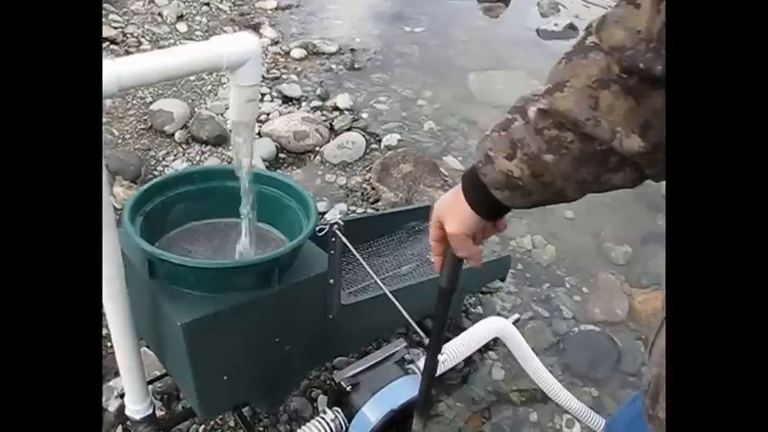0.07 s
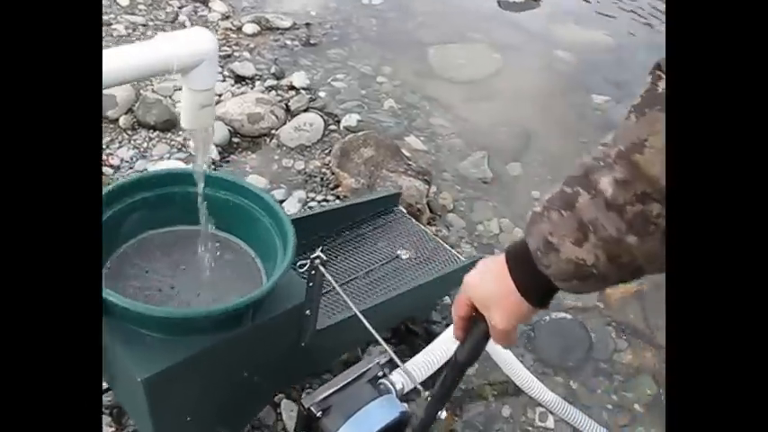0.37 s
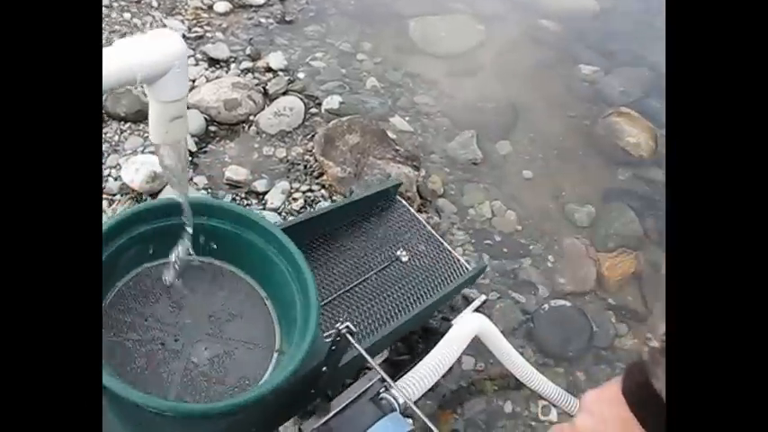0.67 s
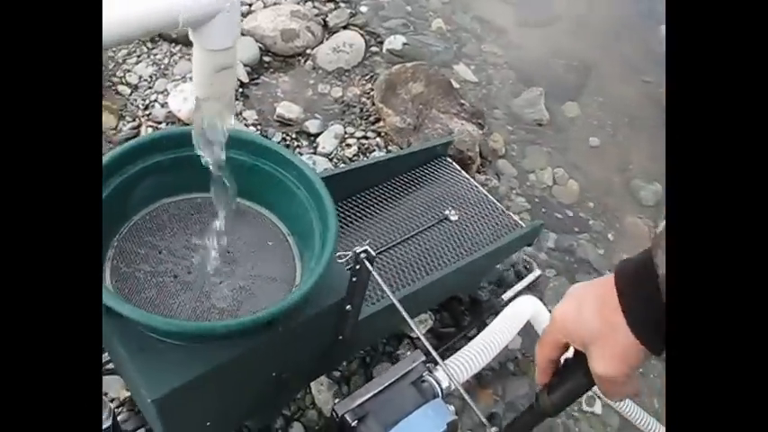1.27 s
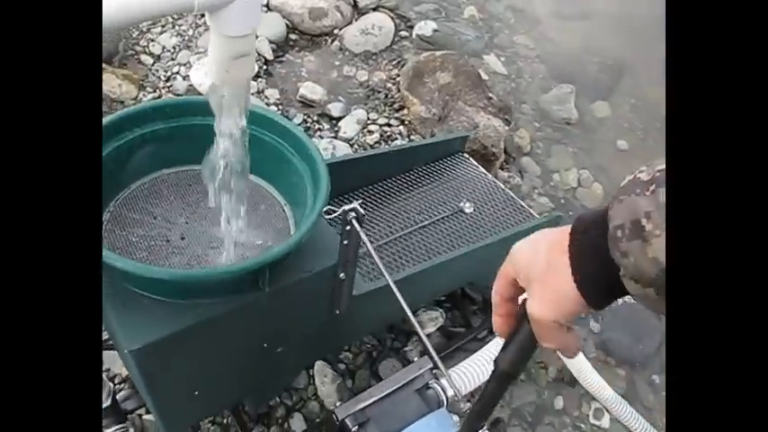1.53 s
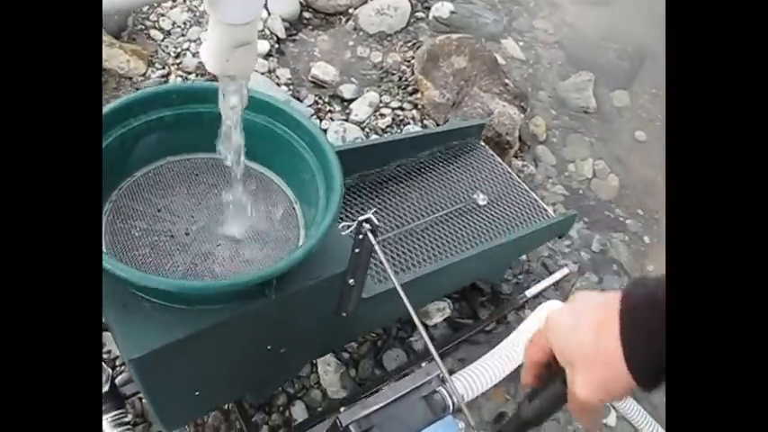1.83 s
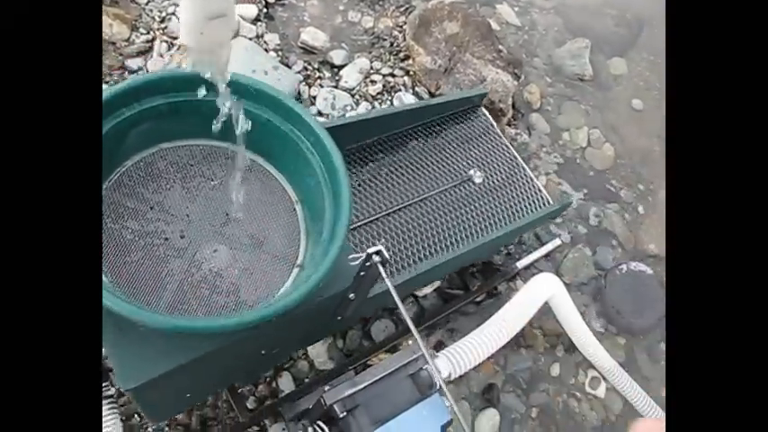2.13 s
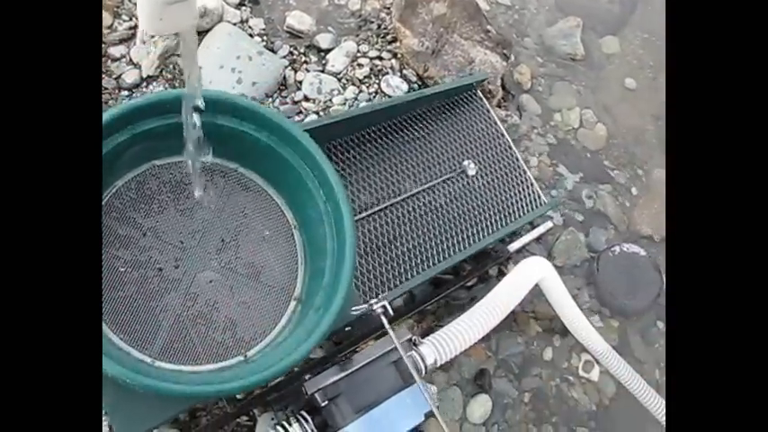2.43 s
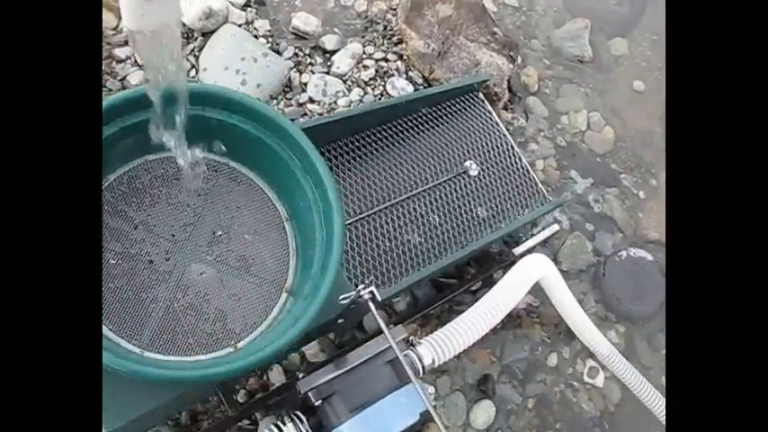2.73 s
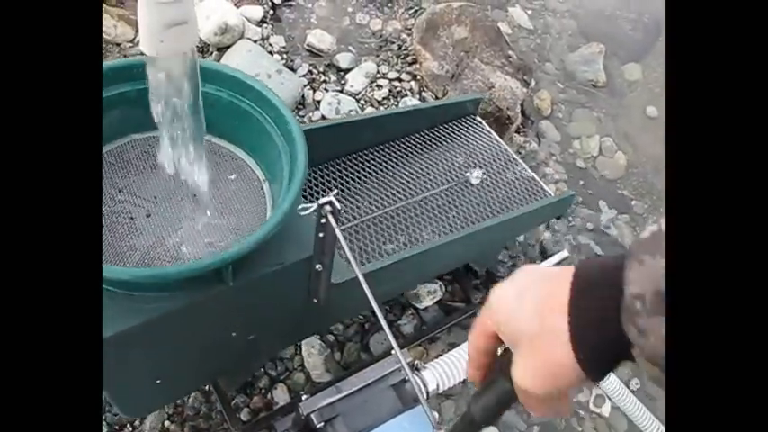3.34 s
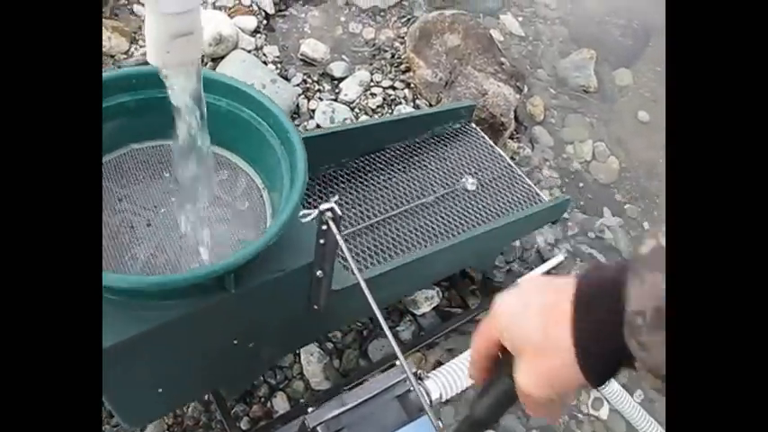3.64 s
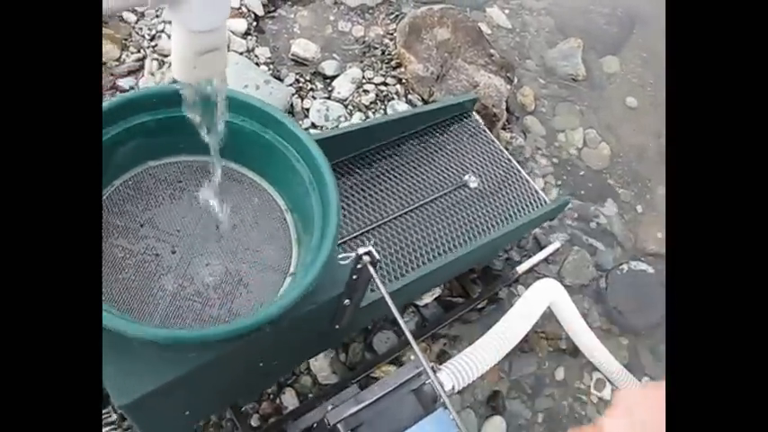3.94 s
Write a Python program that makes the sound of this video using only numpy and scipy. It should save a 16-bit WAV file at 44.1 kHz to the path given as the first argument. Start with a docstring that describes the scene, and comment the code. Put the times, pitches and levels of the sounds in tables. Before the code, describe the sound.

Water pours from a pipe onto a plastic sieve for four seconds, spattering and fizzing in uneven surges, heard from just above. The hollow box below drums softly, with heavier slaps and glugging thumps around 0.2, 0.7, 1.4, 2.4 and 3.2 seconds. Sharp drops tick throughout, with occasional bubbles and froth. Wind bumps the microphone around 0.5 seconds, and a stream washes faintly behind.

```python
"""Hand pump over a rocker box

Beside a stream, water pours from a pump's pipe into a plastic sieve, heard from just above it in stereo.
Drops spatter on the mesh as the flow surges; slugs of water slap down and make the hollow box thump.
Single drops tick, bubbles and froth rise, and a puff of wind bumps the microphone."""
import sys
import numpy as np
from scipy import signal
from scipy.fft import rfft, irfft
from scipy.io import wavfile

SR = 44100
rng = np.random.default_rng(int(sys.argv[2]) if len(sys.argv) > 2 else 0)


def master_out(mix):
    """Clip the mix to full scale and print it as 16-bit PCM to the path in sys.argv[1]."""
    frames = np.transpose(np.atleast_2d(mix))
    ceiling = np.clip(frames, -1, 1)
    pcm = np.round(ceiling * 32767).astype(np.int16)
    wavfile.write(sys.argv[1], SR, pcm)


N = 176400

# modes of the hollow box with its sieve: f/Hz, level/dB, decay/s
BOX_MODES = [(219, 2, 0.015), (244.8, -5.5, 0.031), (313.6, -8, 0.045), (372, -8, 0.016),
             (548, -17.5, 0.016), (985, -23, 0.0047)]


def amp(db):
    """Decibels to gain."""
    return 10 ** (np.asarray(db) / 20)


def unit(x):
    """Scales to rms 1."""
    return x / np.sqrt(np.mean(x ** 2) + 1e-20)


def curve_at(points, hz):
    """Reads a curve on a log-frequency axis."""
    f, value = np.transpose(points)
    return np.interp(np.log(hz + 1), np.log(f + 1), value)


def add(mix, s, sound):
    """Mixes a sound in at s seconds."""
    part = mix[max(round(s * SR), 0):][:len(sound)]
    part += sound[:len(part)]


def colour(x, points):
    """Filters by a spectrum (f/Hz, level/dB), keeping the power of white noise."""
    f = np.fft.rfftfreq(len(x), 1 / SR)
    return irfft(rfft(x) * unit(amp(curve_at(points, f))), len(x))


def wander(hz):
    """Smooth random drift of rms 1, rolling off above hz, with nothing slower than 5 Hz."""
    f = np.fft.rfftfreq(N, 1 / SR)
    return unit(irfft(rfft(rng.standard_normal(N)) / (1 + (f / hz) ** 2) * (f > 5), N))


def swell(t, rise, decay):
    """Quick rise and exponential fall, peak 1."""
    shape = (1 - np.exp(-(t / rise) ** 2)) * np.exp(-t / decay)
    return shape / shape.max()


def drops(per_s, low_hz, high_hz, cycles, spread_db, size=200):
    """Random drops, each a tiny damped ring of its own pitch and strength, size samples long."""
    chance, pitch, strength = rng.random(N), rng.random(N), rng.exponential(1, N)
    onsets = np.flatnonzero(chance < per_s / SR)
    hz = (low_hz + (high_hz - low_hz) * pitch[onsets])[:, None]
    turns = hz * np.arange(size) / SR
    gain = amp(spread_db * np.minimum(strength[onsets], 4.5))[:, None] * np.sqrt(hz)
    rings = gain * np.exp(-turns / cycles) * np.sin(2 * np.pi * turns)
    samples = onsets[:, None] + np.arange(size)
    return unit(np.bincount(samples.ravel(), rings.ravel(), N + size)[:N])


def ripple(x, depth_db=1):
    """Sloshing water shifts the colour of the spatter in drifting patches."""
    frames = signal.stft(x, nperseg=512)[2]
    patch = np.outer(np.hanning(9), np.hanning(21))
    patches = signal.fftconvolve(rng.standard_normal(frames.shape), patch, "same")
    return unit(signal.istft(frames * amp(depth_db * unit(patches)))[1][:N])


def spatter():
    """The jet breaks on the mesh in clumps of drops: a fine fizz and a coarser splash."""
    # surges of the flow: t/s, relative level/dB, lift of the splash/dB
    flow = [(0, -37.5, 19.5), (.03, -29.5, 3), (.2, -26, 4.5), (.3, -31, 3), (.46, -27.5, -1.5),
            (.62, -32, 6.5), (.7, -31.5, 12.5), (.815, -33.5, -1.5), (0.882, -25, 7.5), (.92, -32.5, 3),
            (.97, -27.5, -11), (1.01, -31, -6), (1.07, -33, -14), (1.13, -27, 1), (1.26, -26.5, 2),
            (1.3, -32, 0), (1.385, -29, 10.5), (1.415, -41, -8), (1.53, -34.5, 7), (1.621, -33, 5),
            (1.69, -26, 2.5), (2.02, -25.5, 0.5), (2.2, -28, 2.5), (2.36, -30.5, 10), (2.41, -33.5, 2),
            (2.6, -28, 2.5), (2.843, -32.5, -12), (2.862, -29, -7.5), (2.97, -25.5, 2.5), (3.05, -26.5, 2),
            (3.2, -31, 0.5), (3.3, -28.5, 1), (3.46, -30, 1), (3.53, -25.5, 2), (3.8, -27, 3),
            (4, -30, -2.5)]
    # spectrum of the fine spray: f/Hz, level/dB
    fizz_spectrum = [(400, -69), (1500, -16), (3000, -6), (4300, -2), (8000, -3.5), (10500, -5),
                     (16000, -8)]
    # spectrum of the coarse drops: f/Hz, level/dB
    splash_spectrum = [(150, -12), (450, 3), (700, -4), (1000, -10), (1400, -4), (1800, -7), (2150, -1.5),
                       (3600, -2.5), (6000, -6.5), (16000, -35)]
    s, level, lift = np.transpose(flow)
    t = np.arange(N) / SR
    flow_db = np.interp(t, s, level) + 1.6 * wander(35)  # the drops come in clumps
    lift_db = np.interp(t, s, lift)
    fine = drops(9000, 1520, 16160, cycles=1.24, spread_db=2.5)
    fizz = ripple(colour(fine, fizz_spectrum))
    coarse = drops(2400, 356.4, 5815, cycles=10.7, spread_db=3.5, size=800)
    splash = ripple(colour(coarse, splash_spectrum))
    return fizz * amp(flow_db + 1.5) + splash * amp(flow_db + lift_db - 5)


def box_ring():
    """The hollow box rings in its damped modes after one push."""
    t = np.arange(SR // 5) / SR
    return sum(amp(db) * np.exp(-t / decay) * np.sin(2 * np.pi * hz * t) * (-1) ** k
               for k, (hz, db, decay) in enumerate(BOX_MODES))


def drumming(pushes_per_s=250, pitch_bend=0.05):
    """The falling water keeps the box humming; sloshing bends its pitch and level."""
    # drumming of the jet in the box: t/s, level/dB
    drum_levels = [(0, -32.5), (1.25, -33), (1.46, -38.5), (2.3, -32), (2.47, -34.5), (3.2, -32.5),
                   (4, -32)]
    tone = [(120, 4), (200, -0.5), (260, 6.5), (330, 1), (600, -34), (1200, -26)]  # f/Hz, level/dB
    pushes = rng.standard_normal(N) * (rng.random(N) < pushes_per_s / SR)
    hum = colour(signal.fftconvolve(pushes, box_ring())[:N], tone)
    n = np.arange(N)
    sloshed = np.interp(n + pitch_bend * np.cumsum(wander(4.7)), n, hum, period=N)
    level_db = np.interp(n / SR, *np.transpose(drum_levels)) + 0.61 * wander(8.3)
    return unit(sloshed) * amp(level_db)


def stream():
    """Soft wash and small gurgles of running water in the background."""
    # spectrum of the wash: f/Hz, level/dB
    wash_spectrum = [(30, -9.5), (1400, 3), (2200, -1), (16000, -17.5)]
    wash = colour(rng.standard_normal(N), wash_spectrum)
    gurgles = drops(70, 450, 1800, cycles=10, spread_db=3, size=2500)
    return amp(-42) * wash + amp(-46.5) * gurgles


def wind(floor_db=-65):
    """Wind buffets the microphone with a low rumble, mostly different at each port."""
    # gusts: t/s, level/dB, decay/s
    gusts = [(0, -42, .25), (.43, -21.5, .06), (.605, -22, .035), (.85, -41, .22)]
    rumble = [(10, -18), (25, -3), (75, -1), (140, -12.5), (2000, -65)]  # f/Hz, level/dB
    t, level = np.arange(N) / SR, np.full(N, amp(floor_db))
    for s, db, decay in gusts:
        add(level, s, amp(db) * swell(t, 0.008, decay))
    shared = .5 * rng.standard_normal(N)
    return np.array([level * unit(colour(shared + rng.standard_normal(N), rumble)) for port in range(2)])


def ticks(relative_width=.4):
    """Large drops hit the plastic with a short, pitched spit."""
    # single drops: t/s, level/dB, f/Hz
    hits = [(0.016, -20, 3400), (.222, -15, 2580), (.384, -17, 7000), (.417, -21, 2500), (.757, -17, 2920),
            (.824, -21, 4500), (.895, -13.5, 7000), (1.021, -22, 10000), (1.036, -16.5, 9100),
            (1.083, -13.5, 6400), (1.184, -15, 2600), (1.506, -16.5, 5800), (2.043, -13, 6000),
            (2.523, -19, 2090), (2.571, -22.5, 1900), (2.741, -15.5, 2540), (2.853, -19, 13000),
            (2.901, -14.5, 2920), (3.005, -14, 5500), (3.666, -16, 2800), (3.864, -12.5, 7500)]
    t, out = np.arange(SR // 20) / SR, np.zeros(N)
    f = np.fft.rfftfreq(len(t), 1 / SR)
    shape = swell(t, rise=.0005, decay=.0034)
    for s, db, hz in hits:
        band = 1 / np.sqrt(1 + ((f / hz - hz / (f + 1)) / relative_width) ** 2)
        spit = unit(irfft(band * np.exp(2j * np.pi * rng.random(len(f))), len(t)))
        add(out, s, amp(db) * unit(spit * shape) * np.sqrt(np.mean(shape ** 2)))
    return out


def slugs(glide_s=.018, damping_s=0.023, darken_s=0.003855, darken_hz=1907):
    """Each slug slaps the mesh; its trapped air glugs toward the box's lowest note and rings the box."""
    # slugs of water: t/s, thump level/dB, thump's starting f/Hz, slap level/dB, slap decay/s
    falls = [(0.221, -15, 426, -22.5, 0.033), (0.25, -13.5, 272, -19, 0.0074),
             (0.682, -6.5, 349, -14.5, 0.0051), (.705, -10, 370, -13.5, 0.0035),
             (0.875, -17, 282, -20.5, .016), (0.955, -18, 230, -22.5, 0.022), (1.214, -26, 229, -19, 0.031),
             (1.243, -15, 464, -29.5, 0.053), (1.266, -25, 233, -12, 0.0074),
             (1.367, -14.5, 354, -21, 0.024), (1.386, -12, 303, -12.5, 0.0051),
             (1.646, -15, 258, -22.5, 0.009), (1.91, -17.5, 213, -23, 0.0062),
             (1.926, -31, 211, -19, 0.011), (1.954, -20, 320, -20, 0.0076), (2.248, -19.5, 213, -32, .006),
             (2.344, -24, 447, -16.5, 0.01), (2.358, -14, 383, -15, 0.005), (2.378, -11, 278, -12, 0.0062),
             (2.525, -23, 237, -23, 0.004), (2.588, -18.5, 303, -32, 0.0064),
             (2.854, -43, 231, -19, 0.0053), (2.99, -18, 227, -36, .006), (3.015, -26.5, 514, -21, 0.02),
             (3.053, -26.5, 310, -25, 0.011), (3.152, -11.5, 431, -19.5, 0.0066),
             (3.169, -27, 437, -17, 0.011), (3.176, -11, 314, -16, 0.0051),
             (3.186, -13.5, 216, -31, 0.0058), (3.502, -37, 222, -17, 0.0055),
             (3.795, -21, 252, -24, 0.027), (3.823, -14.5, 277, -18, 0.0035)]
    # spectrum of a slap: f/Hz, level/dB
    slap_spectrum = [(40, -36), (170, -1), (400, 5.5), (560, 9), (700, -4), (1000, 3.5), (1700, 1.5),
                     (2200, 5), (4000, 0.5), (6500, -4), (11000, -10), (16000, -6.5)]
    t, bursts, thumps = np.arange(SR // 5) / SR, np.zeros(N), np.zeros(N)
    ring = amp(-4) * box_ring() * np.exp(-t / damping_s)  # the slug's weight damps the box
    box_hz = BOX_MODES[0][0]
    for s, thump_db, hz, slap_db, decay in falls:
        add(bursts, s - darken_s / 2, amp(slap_db) * swell(t, .001, decay))
        turns = np.cumsum(box_hz + (hz - box_hz) * np.exp(-t / glide_s)) / SR
        glug = swell(t, rise=.0022, decay=.013) * np.sin(2 * np.pi * turns)
        add(thumps, s + 0.001, amp(thump_db) * (glug + ring))
    crackle = drops(12000, 104, 16000, cycles=1.1, spread_db=0.9)
    slaps = colour(bursts * ripple(crackle), slap_spectrum)
    # a slap starts bright; its low notes follow as the cavity opens
    lag_s = darken_s * np.exp(-np.fft.rfftfreq(N, 1 / SR) / darken_hz)
    return thumps + irfft(rfft(slaps) * np.exp(-2j * np.pi * np.cumsum(lag_s) * SR / N), N)


def bubbles(glide_s=.03):
    """Air pockets ring with a gliding pitch that levels off as they reach the surface."""
    # bubbles: t/s, level/dB, starting f/Hz, starting glide/(Hz/s), decay/s
    pockets = [(.49, -24.5, 826, 1000, 0.0061), (.682, -13.5, 990, -300, 0.0069),
               (1.874, -13, 176, 1500, 0.025), (2.251, -21, 740, 7006, 0.021),
               (2.59, -25.5, 775, 2507, 0.0071), (3.309, -13, 960, -500, 0.0073)]
    t, out = np.arange(SR // 10) / SR, np.zeros(N)
    for s, db, hz, glide, decay in pockets:
        pitch = hz + glide * glide_s * np.tanh(t / glide_s)
        add(out, s, amp(db) * swell(t, 0.0012, decay) * np.sin(2 * np.pi * np.cumsum(pitch) / SR))
    return out


def froth(spread=0.22):
    """Clouds of tiny bubbles of like size swell and burst in the sieve."""
    # clouds: t/s, length/s, level/dB, centre f/Hz
    clouds = [(0.955, 0.54, -33.5, 4130), (2.996, 0.31, -34, 1476), (3.271, 0.13, -34, 960),
              (3.479, 0.21, -26.5, 2520), (3.713, 0.25, -31.5, 2340)]
    out = np.zeros(N)
    for s, length, db, hz in clouds:
        cloud = drops(700, hz * (1 - spread), hz * (1 + spread), cycles=8.1, spread_db=2.5, size=800)
        arch = np.sin(np.pi * np.arange(0, length, 1 / SR) / length)
        add(out, s, amp(db) * arch * cloud[:len(arch)])
    return out


def in_sieve(x, decay_s=0.0028):
    """The sieve wall scatters the sound; it reaches the microphone ports with unlike phase and level."""
    # echo off the wall: f/Hz, relative level/dB
    scatter = [(350, -22), (1100, -13.5), (2200, -6), (16000, -3.5)]
    # level between the ports: f/Hz, left minus right/dB
    balance = [(250, -.4), (1300, .4), (2500, -3), (4200, 0), (6500, 3.5), (12000, 1.5)]
    # phase between the ports: f/Hz, lead of the left/rad
    lead = [(1900, 0), (2700, .55), (3700, 1.3), (6000, 1.8), (9800, 1.8), (14000, 3.2)]
    size, hop = 128, 32
    hz, _, frames = signal.stft(x, SR, nperseg=size, noverlap=size - hop)
    carry = np.exp(-hop / SR / decay_s)
    lingering_power = signal.lfilter([1 - carry], [1, -carry], abs(frames) ** 2, axis=1)
    magnitude = 2 * np.sqrt(lingering_power) * amp(curve_at(scatter, hz))[:, None]
    scattered = magnitude * np.exp(2j * np.pi * rng.random((2,) + frames.shape))
    echo = signal.istft(scattered, nperseg=size, noverlap=size - hop)[1][:, :N]
    f, side = np.fft.rfftfreq(N, 1 / SR), np.array([[.5], [-.5]])
    ports = amp(side * curve_at(balance, f)) * np.exp(1j * side * curve_at(lead, f))
    return irfft(rfft(x + echo) * ports, N)


def scene():
    """All the water, heard from over the sieve, and the wind on the microphone."""
    water = spatter() + drumming() + slugs() + ticks() + froth() + bubbles() + stream()
    return in_sieve(water) + wind()


def record(dry, ceiling=1.05, edge_hz=15950):
    """The recorder rounds off the highest peaks and limits the band."""
    rounded = dry / (1 + (dry / ceiling) ** 4) ** .25
    lowpass = signal.firwin(511, edge_hz, window=("kaiser", 9), fs=SR)
    return signal.oaconvolve(rounded, lowpass[None], "same")


dry = scene()
out = record(dry)
master_out(out)
```